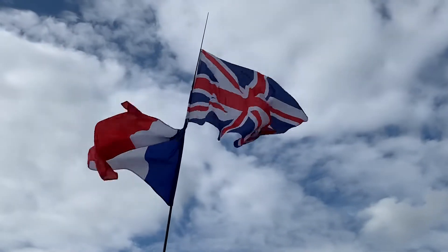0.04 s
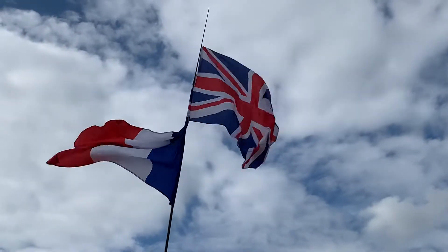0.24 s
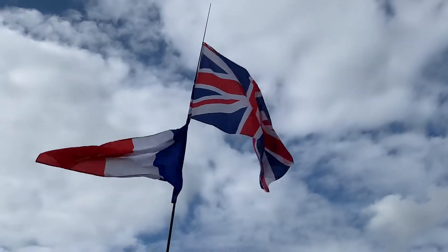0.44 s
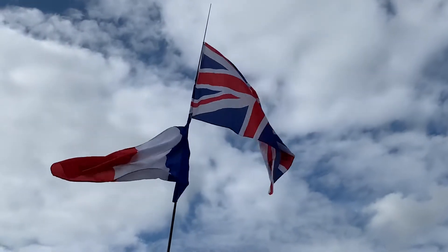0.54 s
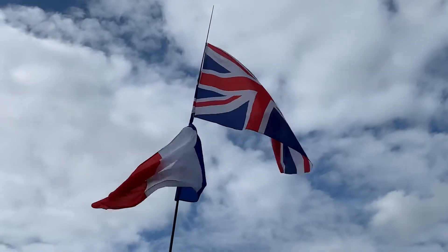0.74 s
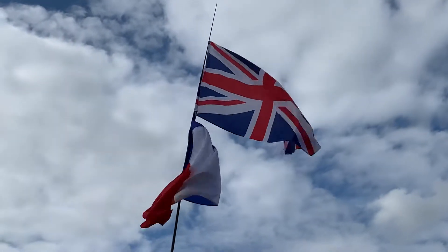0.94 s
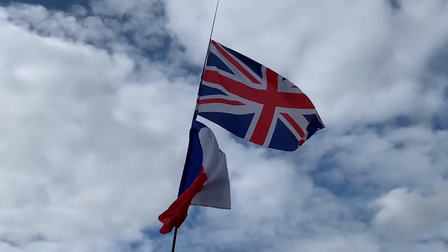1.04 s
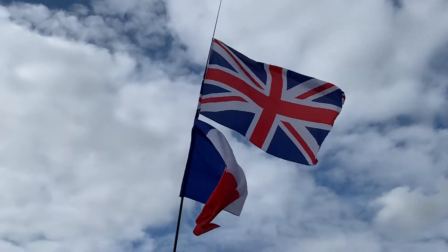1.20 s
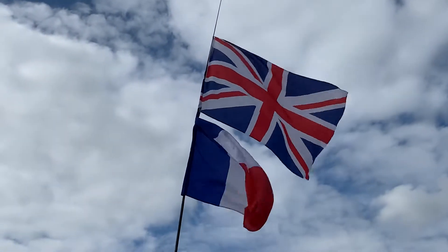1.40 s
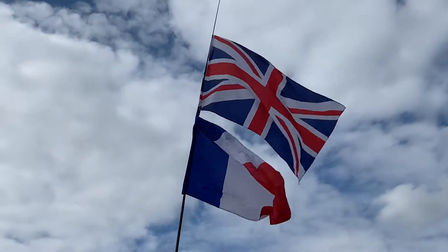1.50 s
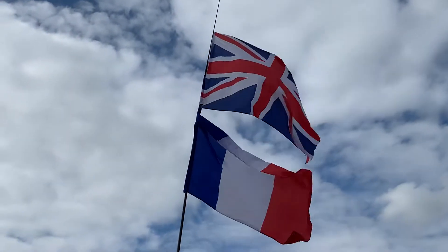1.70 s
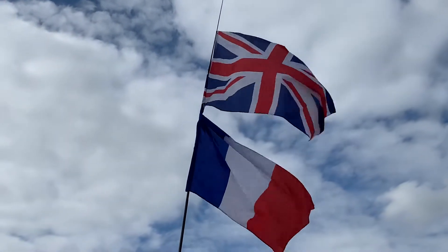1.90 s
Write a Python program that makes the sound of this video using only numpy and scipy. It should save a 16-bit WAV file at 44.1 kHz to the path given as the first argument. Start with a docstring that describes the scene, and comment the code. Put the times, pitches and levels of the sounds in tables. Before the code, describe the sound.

Gusty wind rumbles and thumps on the microphone as flags rustle and one snaps taut

```python
"""First a lumpy low rumble: gusty wind buffets a stereo microphone in the open, and hard eddies thump on it.
Behind it lies the far rush of wind, made of noise bands, with faint whistles past a thin pole as wavering tones.
Flags on the pole rustle as split cloth noise and tick as small noise bursts.
One flag snaps taut: slaps ring a set of resonators, with a noise crack and a dull echo."""
import sys
import numpy as np
from scipy import signal
from scipy.fft import rfft, irfft
from scipy.io import wavfile
from scipy.ndimage import uniform_filter1d

SR = 44100
rng = np.random.default_rng(int(sys.argv[2]) if len(sys.argv) > 2 else 0)


def store_wav(level_fs):
    """Save 16-bit WAV to argv[1]."""
    pcm = np.round(np.clip(np.atleast_2d(level_fs), -1, 1) * 32767)
    wavfile.write(sys.argv[1], SR, pcm.T.astype(np.int16))


N = 85995


def amp(db):
    """Amplitude factor of a level in dB."""
    return 10 ** (np.asarray(db) / 20)


def unit(x):
    """Scale to rms 1."""
    return x / np.sqrt(np.mean(x ** 2) + 1e-20)


def in_time(rows):
    """Draw each column after the first as a line over the time in the first."""
    s, *columns = np.transpose(rows)
    return [np.interp(np.arange(N) / SR, s, c) for c in columns]


def at_hz(points, hz):
    """Read a table of (f, value) along a logarithmic frequency axis."""
    points = np.array(points)
    return np.interp(np.log(hz), np.log(points[:, 0] + 1e-9), points[:, 1])


def band(x, low_hz, high_hz):
    """Band-pass between two edges."""
    return signal.sosfilt(signal.butter(2, [low_hz, min(high_hz, SR * .45)], "band", fs=SR, output="sos"), x)


def split(x, order, edge_hz, kind="low"):
    """Keep what lies below the edge, or above it for kind "high"."""
    return signal.sosfilt(signal.butter(order, edge_hz, kind, fs=SR, output="sos"), x)


def drift(rate_hz):
    """Slow random wander of rms 1: noise through two equal low-pass poles, drawn every 40 samples."""
    step = 40
    r = np.exp(-2 * np.pi * rate_hz * step / SR)
    noise = rng.standard_normal(N // step + 2002)
    slow = signal.lfilter([1], [1, -2 * r, r * r], noise)[2000:]  # the filter has settled by then
    return np.interp(np.arange(N) / step, np.arange(len(slow)), unit(slow))


def dying(start_s, t60_s):
    """Envelope that starts at once and falls 60 dB in t60."""
    t = np.arange(N) / SR - start_s
    return (t >= 0) * amp(-60 * np.maximum(t, 0) / t60_s)


def pair(mid, side, alike):
    """Left and right with a given likeness: 1 the same, 0 unrelated, -1 opposite."""
    alike = np.clip(alike, -1, 1)
    return np.sqrt((1 + alike) / 2) * mid + np.sqrt((1 - alike) / 2) * side * [[1], [-1]]


# Left-right likeness at the stereo microphone: (f/Hz, likeness -1 to 1)
PORT_LIKENESS = [(60, 1), (180, 0.94), (550, 0.57), (1650, -0.31), (4970, -0.13), (15000, 0.23)]


def banded(spectrum, patchy_db):
    """Third-octave bands of stereo noise, each with its own level, flicker and likeness; rms 1."""
    out = 0
    together = drift(14.)
    edges = 130 * 2 ** (np.arange(22) / 3)
    white = rng.standard_normal((2, 2, N))
    for k, (low_hz, high_hz) in enumerate(zip(edges, edges[1:])):
        mid, side = band(white[k % 2], low_hz, high_hz)  # neighbouring bands use separate noise
        centre_hz = np.sqrt(low_hz * high_hz)
        flicker_db = patchy_db * (.8 * together + drift(18.))
        stereo = pair(mid, side, at_hz(PORT_LIKENESS, centre_hz))
        out = out + amp(at_hz(spectrum, centre_hz) + flicker_db) * stereo
    return unit(out)


# Far wind, colour: (f/Hz, relative level/dB per Hz)
RUSH_COLOUR = [(130, -6), (200, -5), (290, -5), (460, -4), (560, -7.5), (940, -8.5), (1600, -16),
               (2500, -28.5), (3300, -52)]
# Far wind, strength at the microphone: (t/s, level/dB)
RUSH_LEVEL = [(0, -63.5), (.2, -59), (.6, -60.5), (.85, -60.5), (1., -60), (1.25, -60.5), (1.5, -59),
              (1.95, -60.5)]


def far_rush():
    """Distant wind: patchy broad noise that swells slowly."""
    return amp(in_time(RUSH_LEVEL)[0]) * banded(RUSH_COLOUR, patchy_db=1.73)


# Faint whistles of wind past the pole: (start t/s, length/s, f at start/Hz, rise/Hz per s, level/dB)
POLE_WHISTLES = [(0.244, 0.28, 1845, 489, -74), (.3, 0.25, 1393, 402, -71.5), (0.91, 0.16, 883, -2, -64),
                 (1.357, 0.51, 5660, -600, -82.5)]
WHISTLE_WIDTH = .06  # bandwidth as a share of the pitch


def whistles():
    """Narrow wavering tones that glide, swell and fade: slow noise carried on a sine and a cosine."""
    t, out = np.arange(N) / SR, np.zeros((2, N))
    for s, length_s, hz, rise, db in POLE_WHISTLES:
        waver = split(rng.standard_normal((2, 2, N)), 2, hz * WHISTLE_WIDTH / 2)
        phase = 2 * np.pi * (hz * t + rise * (t - s) ** 2 / 2)
        swell = np.sin(np.pi * np.clip((t - s) / length_s, 0, 1))
        tone = waver[0] * np.cos(phase) + waver[1] * np.sin(phase)
        out += amp(db) * swell * unit(tone)
    return out


# Cloth of the flags, colour: (f/Hz, relative level/dB per Hz)
CLOTH_COLOUR = [(1800, -0.5), (2500, -3), (3000, -7), (5400, -14.5), (6400, -22), (8200, -18.5),
                (11500, -24), (16000, -18.5)]
# Cloth at the microphone: (t/s, lower rustle level/dB, airy top level/dB)
CLOTH_LEVEL = [(0.0, -68, -78), (0.36, -72, -80), (0.418, -64, -74.5), (0.47, -68.5, -84),
               (0.624, -65, -80.5), (0.89, -77.5, -86.5), (1.118, -69, -76.5), (1.166, -69, -87),
               (1.276, -82, -86), (1.292, -67.5, -83), (1.318, -68, -90), (1.33, -61, -79.5),
               (1.348, -69, -104), (1.416, -66, -92), (1.602, -70.5, -78.5), (1.84, -74.5, -85.5),
               (1.95, -82, -82.5)]
RUSTLE_SPLIT_HZ = 6800


def rustle():
    """Cloth noise whose lower part and airy top swell separately."""
    low_db, top_db = in_time(CLOTH_LEVEL)
    cloth = banded([(1200, -30)] + CLOTH_COLOUR, patchy_db=1.3)  # weak from 1200 Hz down
    low = split(cloth, 4, RUSTLE_SPLIT_HZ)
    top = split(cloth, 4, RUSTLE_SPLIT_HZ, "high")
    return amp(low_db) * unit(low) + amp(top_db) * unit(top)


# Small ticks of the cloth: (t/s, starting level/dB, centre f/Hz, t60/s)
CLOTH_TICKS = [(0.99, -64, 11500, 0.012), (1.157, -65, 3600, 0.017), (1.291, -70, 5460, 0.064),
               (1.29, -71, 8100, 0.11), (1.378, -68, 3600, 0.18), (1.511, -71, 8200, .04),
               (1.700, -65.5, 3830, 0.12), (1.826, -51.5, 445, 0.23)]


def ticks():
    """Tiny bursts of narrow noise that start at once and die away."""
    white = rng.standard_normal((2, N))
    out = 0
    for s, db, hz, t60_s in CLOTH_TICKS:
        narrow = band(band(white, hz / 1.5, hz * 0.97), hz / 1.12, hz * 1.3)
        out = out + amp(db) * dying(s, t60_s) * unit(narrow)
    return out


# The fold runs taut in a few slaps: (t after the start/s, relative level/dB)
FOLD_SLAPS = [(.0008, -1), (.0034, -1.5), (.0081, -2.5), (0.0115, -6.5), (0.0155, -27)]
# Ringing of the taut cloth: (f/Hz, relative level/dB, t60/s)
CLOTH_RINGS = [(406, -29, 0.017), (618, -3.5, 0.032), (889, -4, 0.067), (1235, 1, 0.023), (1434, 1, 0.016),
               (1807, -4, 0.029), (2620, -7.5, 0.011)]
# Echo of the snap, colour: (f/Hz, relative level/dB per Hz)
ECHO_COLOUR = [(300, -6), (900, -1), (1600, -9.5), (2500, -16), (4000, -24), (8000, -39.5)]
SNAP_S, SNAP_DB = 1.329, -36.5
SNAP_PAN_DB = 5.5  # left gain over right
LEFT_LAG_S = .00023  # the slaps reach the left port later
DULLING_DB_PER_S = 703  # later slaps lose this much for each octave above 1 kHz
SLAP_SOFT_HZ = 3100  # cloth hits softly: low-pass of the slaps
CRACK_DB, CRACK_HZ, CRACK_T60_S = -60, 7200, .012
ECHO_DB, ECHO_RISE_T60_S, ECHO_T60_S = -43.5, 0.013, 0.21


def slaps():
    """Each slap strikes every resonance of the taut cloth, with chance in its strength at each port."""
    out = np.zeros((2, N))
    s, db = np.transpose(FOLD_SLAPS)
    at = ((SNAP_S + s + [[LEFT_LAG_S], [0]]) * SR).astype(int)
    for hz, ring_db, t60_s in CLOTH_RINGS:
        dulling_db = DULLING_DB_PER_S * s * max(np.log2(hz / 1000), 0)
        chance_db = rng.normal(0, 3.6, (2, len(s)))
        clicks = np.zeros((2, N)) + 1e-18
        clicks[[[0], [1]], at] = amp(SNAP_DB + db + ring_db - dulling_db + chance_db)
        r, w = amp(-60 / (t60_s * SR)), 2 * np.pi * hz / SR  # decay and turn per sample
        out += signal.lfilter([0, np.sin(w)], [1, -2 * r * np.cos(w), r * r], clicks)
    return split(out, 4, SLAP_SOFT_HZ)


def snap():
    """A flag snaps taut: slaps, a sharp crack of bright noise and a dull echo, nearer the left port."""
    crack = unit(band(rng.standard_normal((2, N)), CRACK_HZ / 0.93, CRACK_HZ * 1.12))
    out = slaps() + amp(CRACK_DB) * dying(SNAP_S, CRACK_T60_S) * crack
    echo_shape = dying(SNAP_S, ECHO_T60_S) - dying(SNAP_S, ECHO_RISE_T60_S)
    out += amp(ECHO_DB) * echo_shape * banded(ECHO_COLOUR, patchy_db=1.2)
    return out * amp([[SNAP_PAN_DB / 2], [-SNAP_PAN_DB / 2]])


RUMBLE_ALIKE, EVENNESS = 0.84, 0.38  # left-right likeness; steadiness 0 to 1


def coloured(spectrum, low_hz, high_hz):
    """Stereo noise with the given colour between two edges, its own swells partly evened out."""
    hz = np.maximum(np.arange(N // 2 + 1) * SR / N, 1)
    edges = 1 / np.sqrt((1 + (low_hz / hz) ** 8) * (1 + (hz / high_hz) ** 12))
    x = irfft(rfft(rng.standard_normal((2, N))) * amp(at_hz(spectrum, hz)) * edges, N)
    power = uniform_filter1d(x ** 2, size=int(1.5 * SR / high_hz))
    swell = np.sqrt(power + .02 * np.mean(x ** 2))
    x = x / swell ** np.clip(EVENNESS, 0, 1)
    return pair(unit(x[0]), unit(x[1]), RUMBLE_ALIKE)


# Gusts on the microphone, before eddies sweep them aside: (t/s, deep level/dB, upper level/dB)
GUST_LEVEL = [(0.0, -57, -49), (0.13, -47.5, -90), (0.19, -52, -53), (0.228, -31, -50),
              (0.32, -47.5, -68.5), (0.396, -26, -37.5), (0.516, -40, -46.5), (0.552, -28.5, -41),
              (0.578, -21, -13), (0.606, -30, -55), (0.634, -35, -53), (0.694, -31.5, -42),
              (0.722, -33.5, -41.5), (0.754, -20.5, -21), (0.776, -22.5, -42.5), (0.814, -52.5, -48.5),
              (0.83, -42.5, -49.5), (0.874, -23, -38), (0.89, -26.5, -32), (0.95, -42.5, -51.5),
              (1.026, -32, -56), (1.086, -53, -52), (1.118, -32.5, -46), (1.184, -46.5, -61),
              (1.232, -36, -33.5), (1.292, -30.5, -40), (1.308, -36.5, -44), (1.4, -43.5, -60),
              (1.422, -41, -56), (1.586, -48, -72), (1.95, -55, -54)]
# Rumble colour: (f/Hz, relative level/dB per Hz)
RUMBLE_COLOUR = [(12, -34.5), (20, -1), (43, 4.5), (70, -2.5), (173, -14), (343, -37), (372, -34),
                 (500, -43.5), (650, -67), (1100, -120)]
DEEP_TOP_HZ = 91  # border of the deep and upper parts


def rumble():
    """Turbulence on the ports: a deep part and an upper part that each follow the gusts."""
    deep_db, upper_db = in_time(GUST_LEVEL)
    deep = coloured(RUMBLE_COLOUR, 20.0, DEEP_TOP_HZ)
    upper = coloured(RUMBLE_COLOUR, DEEP_TOP_HZ, 476.0)
    return amp(deep_db) * deep + amp(upper_db) * upper


# Hard eddies that thump on the microphone: (t/s, swing level/dB, swing f/Hz, puff level/dB, puff f/Hz)
THUMPS = [(0.576, -18, 78.6, -28.5, 335), (0.697, -23, 59, -45, 252), (.756, -22, 64, -33.5, 265),
          (0.879, -16, 84.6, -36.5, 304), (1.25, -27.5, 60, -43, 231), (1.281, -29, 75, -42, 230),
          (1.311, -29.5, 90, -44.5, 300)]
EDDY_CYCLES = .65  # half length of the swing, in its own cycles
EDDY_EDGE = .3  # share of the octave that sharpens the swing
EDDY_SKEW = 0.2  # radians the swing is ahead at one port and behind at the other
PUFF_LEAD_S, PUFF_S = .006, .0027  # lead over the swing; half length
SWEEP = .9  # share of the rumble swept aside at the middle of an eddy


def wind_on_ports():
    """Each eddy is a short low swing of pressure with a brighter puff in front; it sweeps the rumble aside."""
    t, out, calm = np.arange(N) / SR, np.zeros((2, N)), 1
    for s, db, hz, puff_db, puff_hz in THUMPS:
        turns = (t - s) * hz
        shape = np.exp(-(turns / EDDY_CYCLES) ** 2)
        phase = 2 * np.pi * turns + EDDY_SKEW * np.array([[1], [-1]]) * rng.choice([-1, 1])
        out -= amp(db) * shape * (np.cos(phase) + EDDY_EDGE * shape * np.cos(2 * phase))
        front = t - s + PUFF_LEAD_S
        # a chance phase, slightly different at each port
        puff_phase = rng.uniform(0, 2 * np.pi) + rng.normal(0, 0.44, (2, 1))
        puff = np.cos(2 * np.pi * puff_hz * front + puff_phase)
        out += amp(puff_db) * np.exp(-(front / PUFF_S) ** 2) * puff
        calm = calm * (1 - SWEEP * np.sqrt(shape))
    return out + calm * rumble()


def scene():
    """Far wind, pole and flags, then the wind on the microphone itself."""
    return far_rush() + whistles() + rustle() + ticks() + snap() + wind_on_ports()


CUTOFF_HZ = 15800


def record(dry):
    """A steep low-pass cuts the top, 70 dB down from just above the cutoff."""
    return signal.sosfilt(signal.cheby2(12, 70, CUTOFF_HZ * 1.04, fs=SR, output="sos"), dry)


dry = scene()
out = record(dry)
store_wav(out)
```